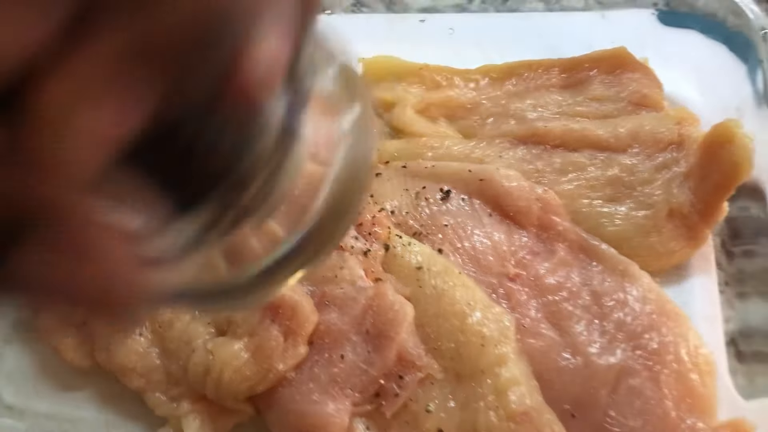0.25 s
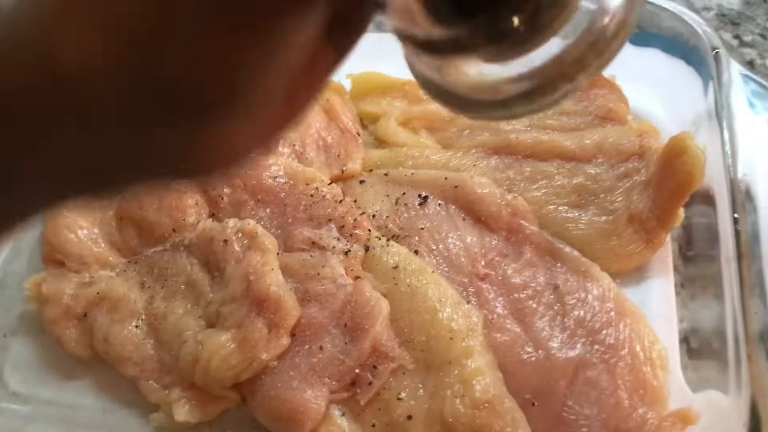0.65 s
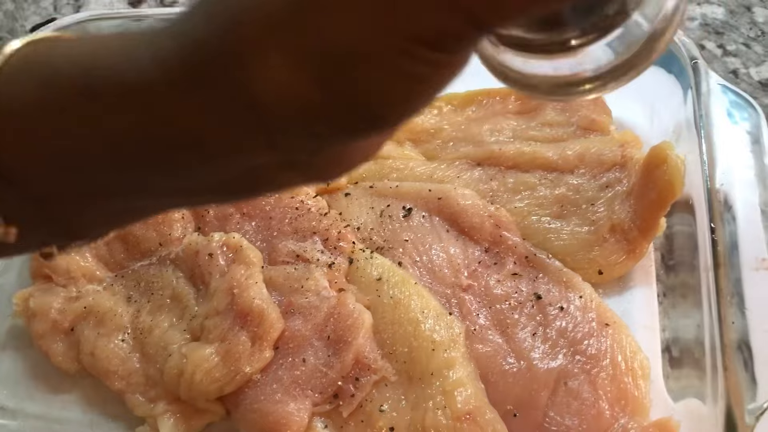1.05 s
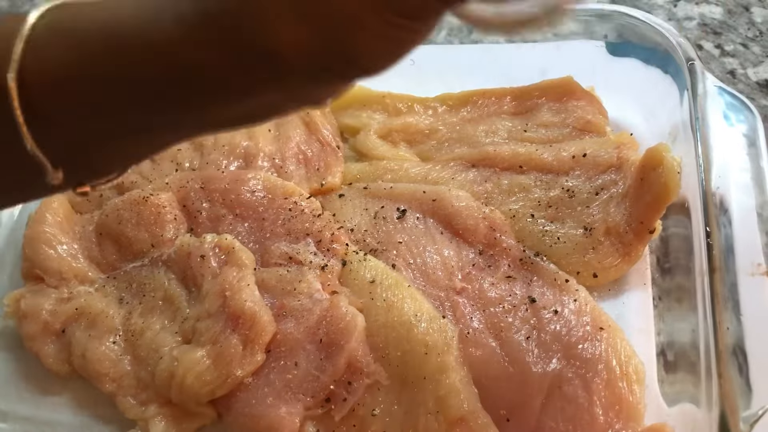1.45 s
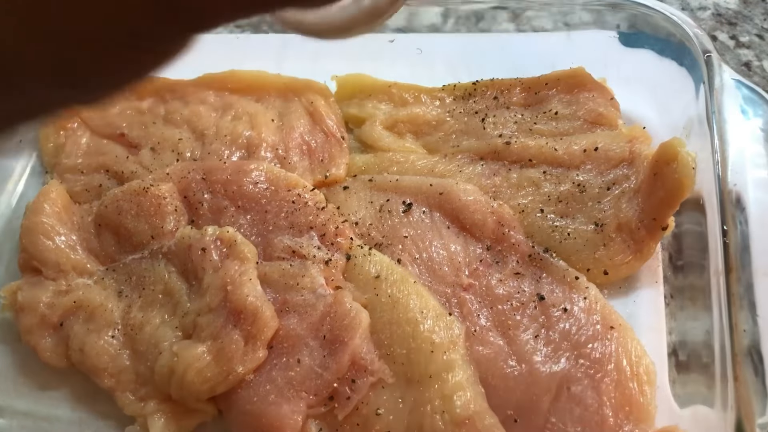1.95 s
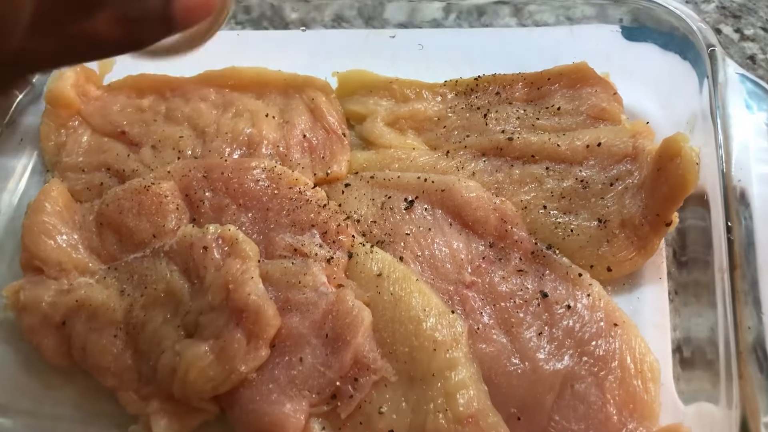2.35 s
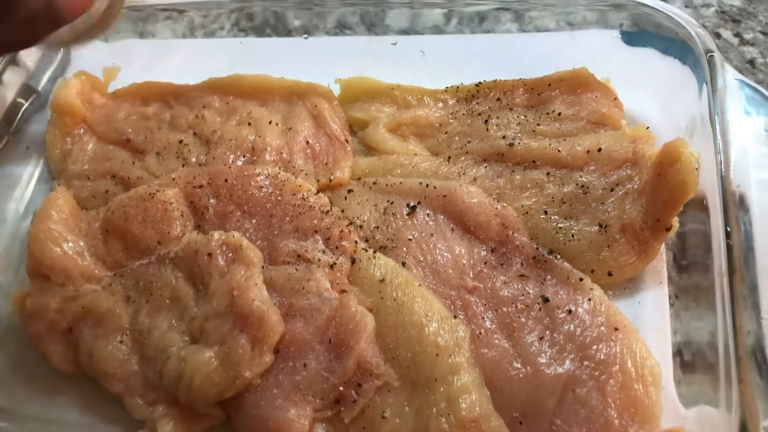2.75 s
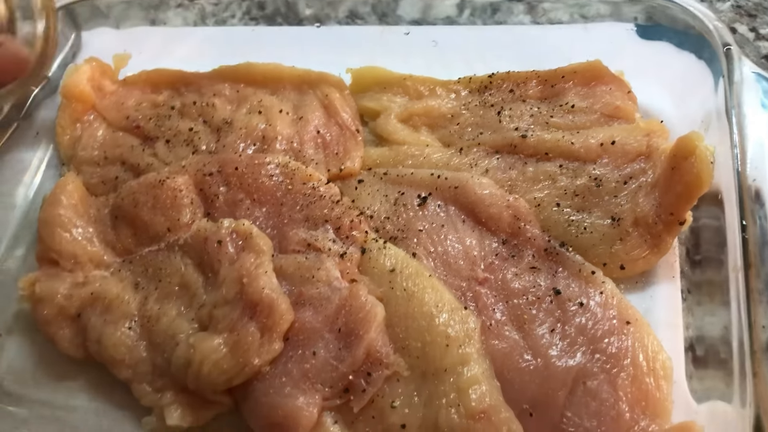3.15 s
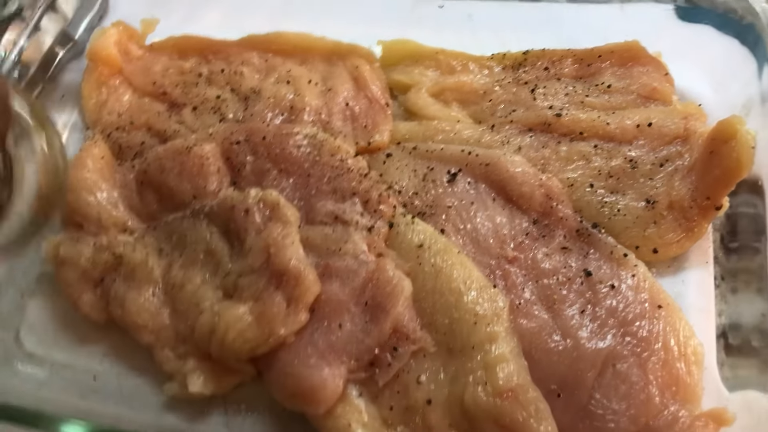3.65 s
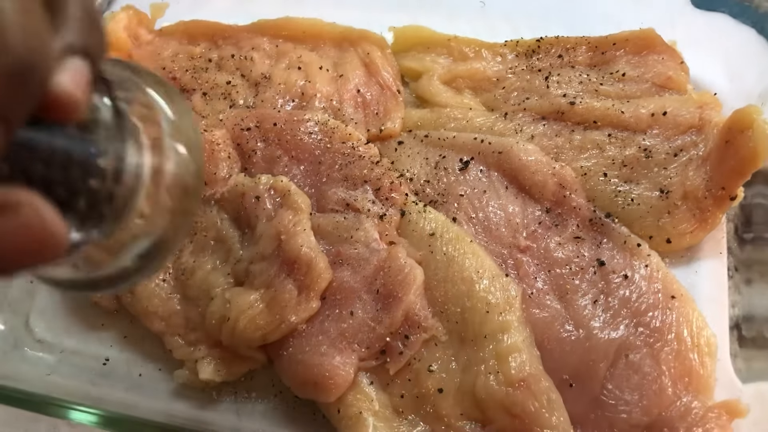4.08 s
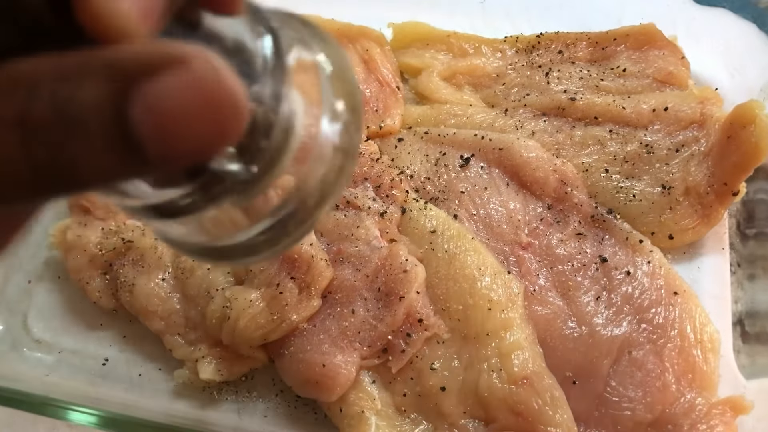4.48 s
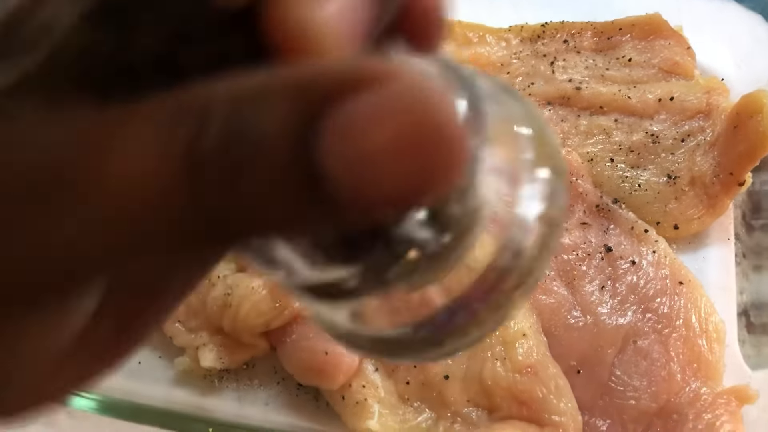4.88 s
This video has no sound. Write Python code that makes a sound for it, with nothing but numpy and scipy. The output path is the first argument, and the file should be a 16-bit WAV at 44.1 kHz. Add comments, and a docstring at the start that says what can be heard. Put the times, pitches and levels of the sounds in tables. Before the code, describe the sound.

A hand-held pepper grinder is twisted close by, cracking peppercorns in short, gritty, rhythmic crunches in a quiet kitchen.

```python
"""In a quiet kitchen, a hand-held pepper mill is twisted back and forth close to the microphone.
Peppercorns fracture between the burrs in short bursts, and the crumbs are sheared to grit, a dense
train of clicks. Both excite the modes of the mill's shell, and the hand adds soft, low knocks.
The walls reflect the mill's sound; beneath it lie steady room noise and a far appliance's hum."""
import sys
import numpy as np
from scipy import signal
from scipy.fft import rfft, irfft
from scipy.io import wavfile

SR = 44100
rng = np.random.default_rng(int(sys.argv[2]) if len(sys.argv) > 2 else 0)


def unload_audio(sound):
    """Save the sound as a 16-bit wav file, at the path given as the first command line argument."""
    columns = np.transpose(np.atleast_2d(sound))
    # keep every value between -1 and 1, then stretch to whole-number steps
    steps = np.round(np.clip(columns, -1, 1) * 32767)
    wavfile.write(sys.argv[1], SR, steps.astype(np.int16))


N = 225839
TIME = np.arange(N) / SR
CROSSOVER_HZ = 5650   # divides the body of a break from its treble


def from_db(db):
    """Amplitude ratio of a level in decibels."""
    return 10 ** (np.asarray(db) / 20)


def rms_one(x):
    """Normalisation to unit rms."""
    return x / np.sqrt(np.mean(x ** 2) + 1e-20)


def resonance(x, hz, width_hz):
    """A damped resonator: two poles, unit gain at the peak."""
    r = np.exp(-np.pi * width_hz / SR)
    poles = [1, -2 * r * np.cos(2 * np.pi * hz / SR), r * r]
    return signal.lfilter([(1 - r * r) / 2, 0, (r * r - 1) / 2], poles, x)


def passed(x, hz, kind):
    """Second-order low-, high- or band-pass filtering."""
    return signal.sosfilt(signal.butter(2, hz, kind, fs=SR, output="sos"), x)


def drift(rate_hz):
    """Slow random fluctuation: low-passed noise of unit rms."""
    return rms_one(passed(rng.standard_normal(N + SR), rate_hz, "low")[SR:])


# The spectrum of the room noise. Each row: frequency in Hz, relative spectral density in dB.
ROOM_SPECTRUM = [(25, -36), (45, -5.5), (125, 1.5), (340, -1.5), (420, -5.5), (900, -11), (2000, -16.5),
                 (4000, -72), (8000, -33), (15000, -32.5)]


def room_noise(level_db):
    """Stationary noise: a white spectrum weighted towards the bass."""
    hz = np.maximum(np.arange(N // 2 + 1) * SR / N, 1)
    point_hz, point_db = np.transpose(ROOM_SPECTRUM)
    colour = from_db(np.interp(np.log(hz), np.log(point_hz), point_db))
    return from_db(level_db) * rms_one(irfft(rfft(rng.standard_normal(N)) * colour, N))


# The partials of the hum. Each row: centre frequency in Hz, median rms level in dB.
HUM_PARTIALS = [(50, -72.5), (99, -66), (139, -66.5), (200, -71), (277, -70.5), (344, -68.5)]


def appliance_hum():
    """A line spectrum: each partial of the far appliance wavers in frequency and amplitude."""
    hum = 0
    for hz, level_db in HUM_PARTIALS:
        phase = 2 * np.pi * np.cumsum(hz + 1.54 * drift(4.5)) / SR
        hum += from_db(level_db + 4.3 * drift(5.5)) * np.sqrt(2) * np.sin(phase)
    return hum


# The kitchen's reverberation. Each row: band frequency in Hz, time to fall 60 dB in seconds,
# echo level in dB before weighting for bandwidth.
REVERB_BANDS = [(382, 0.081, -39.5), (928, 0.23, -34.5), (1600, 0.36, -31), (3110, 0.39, -28.5),
                (5050, 0.27, -25), (10200, 0.3, -17), (13300, 0.17, -16)]


def wall_echoes(x):
    """Reverberation: convolution with noise that decays exponentially, band by band."""
    t = np.arange(SR // 2) / SR
    onset = 1 - np.exp(-t / 0.00043)
    response = 0
    for hz, t60, echo_db in REVERB_BANDS:
        band = passed(rng.standard_normal(len(t)), [hz / 1.44, min(hz * 1.16, .45 * SR)], "band")
        tail = band * from_db(-60 * t / t60) * onset
        response += from_db(echo_db) * tail / np.sqrt(np.sum(tail ** 2) * 3 * hz / SR) / 2
    return signal.fftconvolve(x, response)[:N]


# The hand knocks or regrips the mill. Each row: start in seconds, level in dB, final pitch in Hz.
KNOCKS = [(0.198, -46, 171), (0.25, -43, 227), (0.309, -50, 116), (0.373, -47, 124), (0.469, -42.5, 229),
          (.895, -65, 231.3), (0.941, -42.5, 70), (0.974, -48, 287), (0.986, -39, 80), (1.841, -39, 170),
          (3.051, -40.5, 200), (3.487, -41.5, 210), (1.368, -58, 302), (2.19, -52.5, 193),
          (3.61, -44.5, 130), (3.665, -43, 246), (4.277, -36, 206), (4.643, -46, 167), (4.701, -43, 103),
          (4.804, -35, 200), (4.852, -43, 179), (4.915, -36, 151), (5.04, -35, 230)]


def hand_knocks(sag, sag_s, decay_s):
    """Soft impact: a damped low tone whose pitch sags as the skin flattens."""
    t = np.arange(SR // 10) / SR
    out = np.zeros(N + len(t))
    for start, level_db, hz in KNOCKS:
        phase = 2 * np.pi * np.cumsum(hz * (1 + sag * np.exp(-t / sag_s))) / SR
        i = round(start * SR)
        out[i:i + len(t)] += from_db(level_db) * np.sin(phase) * np.exp(-t / decay_s)
    return out[:N]


# The modes of the mill's plastic shell. Each row: frequency in Hz, bandwidth in Hz, relative gain in dB.
SHELL_MODES = [(910, 460, 5.5), (1530, 1400, 23.5), (2100, 350, -12), (2580, 1800, 29), (3470, 300, 5),
               (4640, 1100, 27.5), (6200, 900, -22)]


def shell(x):
    """Modal superposition: the shell's broad resonances add with alternating sign."""
    return sum((-1) ** k * from_db(db) * resonance(x, hz, width)
               for k, (hz, width, db) in enumerate(SHELL_MODES))


def treble(x, hz, width_hz):
    """Spectral shaping of a break's bright end: a broad resonance over a fainter flat top."""
    high = passed(x, CROSSOVER_HZ, "high")
    peak = resonance(resonance(high, hz, width_hz), hz, 2 * width_hz)
    return rms_one(peak + from_db(-3) * high)


# Turns of the wrist, strong forwards and weak backwards. Each row: start and end in seconds, grit level
# in dB, bite and release rates in dB per second, base rasp and brightness in dB relative to the grit.
WRIST_TURNS = [(0.0, 0.073, -44.5, 450, 401.5, 4.5, -3.5), (0.184, 0.216, -57.5, 597, 595.5, -10, -0.5),
               (0.325, 0.386, -61.5, 899.5, 395.5, 1, 7.5), (0.412, 0.546, -44.5, 696.5, 698.5, 0, -6.5),
               (0.798, 0.876, -65, 304, 397, -10, 8.5), (0.901, 0.978, -45, 499.5, 252.5, 6, -12.5),
               (1.257, 1.324, -60.5, 1505, 405, 5, -3.5), (1.356, 1.421, -36, 1503, 297.5, -9.5, -6),
               (1.583, 1.601, -61, 401, 400, -8, -3.5), (1.773, 1.869, -37.5, 299, 450, -12.5, -3.5),
               (2.186, 2.255, -38, 499.5, 346.5, -24, -8), (2.351, 2.391, -58.5, 510, 301.5, 1, -8.5),
               (2.601, 2.667, -38, 905, 350, -12, -5.5), (2.762, 2.815, -60.5, 389, 397, -26, -12),
               (2.945, 2.988, -59, 701, 401.5, -5, -3.5), (3.004, 3.077, -39, 900, 282, 1.5, -10),
               (3.327, 3.391, -59, 597, 396, -11, -3), (3.432, 3.499, -39.5, 281, 448.5, 1.5, -5.5),
               (3.834, 3.908, -43.5, 401, 301, 2.5, -2.5), (4.15, 4.237, -63, 798, 401.5, 2.5, -3.5),
               (4.252, 4.298, -35.5, 1494.5, 299.5, -2, -7), (4.613, 4.668, -59, 1494.5, 397.5, 6.5, 0),
               (4.69, 4.752, -36, 1508.5, 603, -2.5, -3.5), (4.802, 4.834, -54, 491, 198.5, 4, -6),
               (5.039, 5.07, -56, 1511, 393, -15, -2), (5.103, 5.122, -42.5, 601.5, 400, -7, -3)]


def wrist():
    """Envelopes in dB of grit, rasp and brightness: turns bite, hold and let go, and their powers add."""
    power = 1e-9
    for start, end, hold_db, bite, release, _, _ in WRIST_TURNS:
        before, after = np.maximum(start - TIME, 0), np.maximum(TIME - end, 0)
        turn_db = -bite * before - release * after
        trickle_db = -19 - 200.5 * before - 80 * after   # loose crumbs around the turn
        power += from_db(2 * (hold_db + np.maximum(turn_db, trickle_db)))
    grit_db = 10 * np.log10(power)
    starts, ends, *_, rasps, brights = np.transpose(WRIST_TURNS)
    middles = (starts + ends) / 2
    rasp_db = np.interp(TIME, middles, rasps) + 0.056 * (grit_db + 39)   # burrs ring more under load
    bright_db = np.interp(TIME, middles, brights) + 0.037 * (grit_db + 42)
    return grit_db, rasp_db, bright_db


# The moving mill has more bass near the microphone. Each row: time in seconds, extra rumble in dB.
PROXIMITY = [(0, 1), (.9, 6), (1.6, 0.5), (2.4, -4), (3.4, -5), (4.2, 2), (5.12, 5)]


def grit(grit_db, rasp_db, bright_db, clicks_per_s, spread_db):
    """Shot noise: crumbs sheared between the burrs give dense, uneven clicks that come in clumps."""
    sizes = from_db(spread_db * np.minimum(rng.exponential(1, (4, N)), 4))
    signs = rng.choice([-1, 1], (4, N))
    clumps = from_db(3.58 * drift(53))
    clicks = sizes * signs * (rng.random((4, N)) < clicks_per_s / SR) * clumps
    body = rms_one(passed(shell(clicks[0]), 5100, "low"))
    bright = from_db(bright_db) * treble(clicks[1], hz=3800, width_hz=6900)
    rumble_db = -11 + np.interp(TIME, *np.transpose(PROXIMITY))
    rumble = from_db(rumble_db) * rms_one(passed(clicks[2], [68.6, 900], "band"))
    rasp = from_db(rasp_db) * rms_one(resonance(clicks[3], hz=5070, width_hz=1100))   # the burrs' ring
    return from_db(grit_db) * (body + bright + rumble + rasp)


def splinters(grit_db, count, low_hz, high_hz):
    """A random point process: rows of small fractures, denser and louder the harder the turn."""
    when, size, pitch, thud, snap, duration = rng.random((count, 6)).T
    cumulative_chance = np.cumsum(from_db(.25 * grit_db))
    i = np.searchsorted(cumulative_chance, when * cumulative_chance[-1])
    level_db = grit_db[i] - 2 - 4 * np.log(1 - .95 * size)
    hz = low_hz * (high_hz / low_hz) ** pitch
    thud_db, snap_db = -26 + 16 * (thud - .5), -13 + 16 * (snap - .5)
    crumble_ms = 2.3 * 3 ** (duration - .5)
    return np.transpose([i / SR, level_db, hz, thud_db, snap_db, crumble_ms])


# The peppercorns that crack aloud. Each row: start in seconds, level in dB, ring frequency in Hz,
# thud and snap in dB relative to that level, crumbling time constant in milliseconds (capped at 12).
FRACTURES = [(.0112, -31.5, 3240, -5, -3, 3.1), (.024, -29, 2320, -5, 0, 2.7),
             (.0604, -30, 3200, -10, -17, 1.3), (.0834, -40, 4500, -24, -17, 1.4),
             (.1879, -43.5, 3000, 3.5, -18, 2.5), (.196, -31, 2650, -3, -33, 1.26),
             (.2473, -44.5, 1310, -24, -7, 3.8), (.3156, -52.5, 5740, -17, 1, 4.2),
             (.3396, -45.5, 5840, -11, 4, 0.98), (.361, -46.5, 2780, -5, -1, 1.3),
             (.367, -44, 1280, -1, -8, 1.5), (.38, -45.5, 2910, -5, -16, 2.8),
             (.4108, -34.5, 2780, -30, -13, 1.4), (.4189, -37.5, 2340, -31, -3, 14),
             (.4447, -31, 4620, -34, -12, 2.9), (.4681, -27.5, 2550, -15, -7, 2.8),
             (.4771, -25, 4600, -33, -11, 1.1), (.4807, -29.5, 2550, -28, -7, 3),
             (.5, -35, 4600, -34.5, -6, 5.2), (.5314, -33.5, 4740, -10.5, -10, 5.3),
             (.5453, -31.5, 4660, -10, -18, 1.1), (.6256, -42.5, 5150, -16, -10, 1.3),
             (.6366, -42.5, 2280, -3, -9, 2.5), (.684, -45, 1510, -4, -14, 2),
             (.7034, -50, 1220, -7, -4, 1.2), (.7536, -50.5, 2320, 1, -12, 3.8),
             (.8096, -47, 6040, -21, 3, 0.86), (.8267, -48, 2140, 3.5, -10, 3.1),
             (.8322, -44, 1250, -11, -19, 1.6), (.8594, -43.5, 2600, -14, -2, 1.4),
             (.8816, -49, 4970, -9, -12, 2.9), (.8923, -24.5, 4640, -19, -7, 4.2),
             (.9168, -28, 2760, -28, -15, 2.3), (.9247, -10.5, 4780, -15, 0, 1.9),
             (.927, -14.5, 1560, -6, -8, 1.14), (.9493, -30.5, 1420, -10, -18, 2.5),
             (.9707, -13, 2420, -12.5, -2, 2.63), (.9924, -29.5, 2750, -4, -4, 3.7),
             (1.0158, -36, 4500, -27, -1, .88), (1.2486, -32, 1350, -19, 1, .64),
             (1.252, -21.5, 1845, -19, -17.5, 2.4), (1.3033, -48.5, 5200, 0.5, -5, 1.9),
             (1.3529, -23.5, 2680, -17, -4.5, 8.2), (1.3663, -39, 2820, -24, 9, 1.5),
             (1.378, -21.5, 2500, -22, -1.5, 2.6), (1.3859, -18.5, 1710, -10.5, -21, 1),
             (1.3956, -29, 4400, -17, -24, 3.3), (1.4051, -26, 1960, -19, -19, 4.7),
             (1.4216, -40, 4350, -4, -14, 3.4), (1.4328, -40, 4280, -4, -5.5, 9.8),
             (1.5034, -46, 5560, -23, 7.5, 1.2), (1.5156, -57, 5400, -6, 0, 1.1),
             (1.5773, -42.5, 1950, -16, -8, 2.7), (1.591, -39, 1920, -7, -15, 1.9),
             (1.7013, -47, 2680, -0.5, -4, 1.3), (1.7221, -46, 1970, -17.5, -12, 3.8),
             (1.7351, -55, 2420, -21, -13, 2), (1.7433, -29, 2460, -27, -16, 0.58),
             (1.7551, -37, 6200, -28, -5, 2.1), (1.7671, -24.5, 2860, -40, -27, 1.2),
             (1.781, -25, 2020, -30, -13, 1.6), (1.7891, -19, 3200, -36, -27, 0.99),
             (1.812, -37, 2450, -2, -18, 5.8), (1.8217, -30, 2600, -17, -25, 5.2),
             (1.8372, -21.5, 2980, -4.5, -2, 1.7), (1.8605, -37, 4300, -18, -6, 11),
             (1.8763, -41, 3200, -2, -1, 5.9), (2.081, -43, 3190, -5.5, -12, .96),
             (2.0894, -57.5, 1210, -1, -1.5, 2.5), (2.1419, -54.5, 2470, -0.5, -5, 4.9),
             (2.1578, -35.5, 2380, -26, -28, 1.8), (2.1747, -35, 1560, -20, -10, 1.4),
             (2.1791, -37, 2200, -30, -13, 3.9), (2.2023, -38.5, 3300, 3, -1, 6.5),
             (2.211, -31.5, 1440, -8, -15, 3.5), (2.2295, -28.5, 2300, -29, -10, 3.7),
             (2.248, -36.5, 2830, 0.5, -16, 4.4), (2.2699, -40.5, 1730, -27, -12, 3.7),
             (2.3487, -38, 2110, -12.5, -11, 3.1), (2.3857, -49, 2540, -3, -18, 3.7),
             (2.4254, -47, 1336, 2, -23, 2.7), (2.4868, -51, 1290, -3.5, -9, 2.6),
             (2.5414, -47.5, 1300, -3, -18, 1.6), (2.5555, -44, 2620, -12, -9, 5.2),
             (2.5945, -33.5, 2180, -29, -2, 2.2), (2.6017, -27, 2370, -32, -9, 1.4),
             (2.6378, -31, 1880, -26, -22, 4.6), (2.656, -36.5, 2400, -3, 1, 8.6),
             (2.7567, -39.5, 2080, -5, -6, 3.5), (2.8189, -47, 5520, 0, -12, 0.96),
             (2.911, -46.5, 1880, -5, -9, 2.4), (2.9202, -51, 2130, -4, -22, 0.93),
             (2.9413, -40.5, 5990, -6, 1.5, 2.2), (2.949, -43.5, 2030, -22, -6, 2.1),
             (2.9887, -36, 2360, -3, -16, 0.95), (3.0098, -29.5, 2700, -13, -5, 4.7),
             (3.0274, -34, 2360, -6.5, -23, 3.1), (3.0466, -20, 2920, -17.5, -3, 3.9),
             (3.0701, -31, 4480, -22, -8, 1.6), (3.0831, -37, 2960, -21, -2, 2.5),
             (3.1405, -45.5, 5740, -19, -16, 2.9), (3.2059, -46, 2300, -2, -8.5, 3.6),
             (3.25, -53, 1190, 1.1, -10, 2.6), (3.3553, -46.5, 2570, 3, -9.5, 1.5),
             (3.363, -41.5, 2490, -21, -6, 2), (3.4124, -48, 4910, -30, -11, 5.2),
             (3.4258, -39, 2100, -28, -12, 7.7), (3.432, -36, 3750, -30, -20, 4.4),
             (3.4586, -34, 3650, -25, -22, 13), (3.4842, -28.5, 4770, -1.5, -5, 3.2),
             (3.5078, -36, 5030, -33, -3, 1.6), (3.554, -44, 5450, -11, 5.5, 3.6),
             (3.5683, -33, 5700, -32, -7, 1.6), (3.5772, -36.5, 5800, -28, -7, 3.5),
             (3.5916, -43, 5270, -8, -18, 5.1), (3.6187, -44, 2040, -6, -5, 3.5),
             (3.667, -39.5, 1780, -4, -14, 2.2), (3.7312, -54, 6000, 1, -0.5, 16),
             (3.7594, -50.5, 1840, -8, -5, 4.2), (3.7833, -40.5, 2730, -9, -2, 1.4),
             (3.8364, -35, 5060, -10, -15, 2.2), (3.8863, -35, 2950, -3.5, -3, 9.9),
             (3.8964, -33, 2190, -4, -14, 2.1), (3.9102, -36, 4800, -25, -8, 3),
             (3.9495, -31.5, 4760, -10.5, -7.5, 2.5), (3.9776, -44, 3560, -19, -5, 1.2),
             (4.009, -42, 3600, -14, -4, 1.4), (4.0492, -40, 2480, -3.5, -9.5, 3),
             (4.1488, -52, 3840, 2.5, -12, 1.5), (4.1789, -47.5, 2280, -1, -7, 2.7),
             (4.1998, -43.5, 2760, -20, -8, 1.5), (4.2486, -33, 2800, -20, -7.5, 11),
             (4.2732, -11, 2700, -20, .5, 1.07), (4.2759, -31, 3070, -5, -1, 16),
             (4.305, -41, 2870, -2, 5, 1.8), (4.3258, -35, 3500, -8, -4, 3.5),
             (4.3505, -40.5, 3100, -13, -7.5, 4.3), (4.4174, -36.5, 2160, -9.5, -10.5, 3.2),
             (4.538, -52.5, 1530, 5, -11, 2.7), (4.6081, -45.5, 2465, 1, -9, 2.5),
             (4.628, -36.5, 3100, -45, -4, 1.1), (4.6389, -36.5, 2780, -12, -6, 1.9),
             (4.677, -34, 4590, -26, -20, 1.36), (4.686, -10.5, 4420, -31, -1.5, 0.7),
             (4.7118, -32, 4480, -16, -7, 1.6), (4.741, -25.5, 1250, -17, -4, 0.99),
             (4.7441, -27.5, 2450, -2.5, -14, 1.2), (4.794, -40.5, 4330, -18, 3, 5.2),
             (4.802, -20, 3040, -5.5, -3, 2.65), (4.8503, -38.5, 1190, -5, -7, 1.1),
             (4.8656, -31.5, 1430, -14, -17, 1.3), (4.9109, -45.5, 4830, -15, 3.5, 1.1),
             (4.9153, -49.5, 1210, 8, -3, 1.7), (4.9406, -47, 5300, -24, -13, 0.57),
             (4.9565, -45.5, 1620, -3, -11, 3.4), (4.994, -61, 4450, -10, 8, 1.4),
             (5.038, -30.5, 1390, -6, -2.5, 2.6), (5.041, -29, 4600, -31, -22, 1.4),
             (5.0941, -23.5, 2500, -6.5, -10, 1.64)]


def cracks(splinter_rows, rise_s, split_s, ring_q):
    """Brittle fracture: each burst excites one damped ring, the shell, a thud and a bright snap."""
    rows = np.vstack([FRACTURES, splinter_rows])
    length = 2048
    t = np.arange(length) / SR
    noise = rng.standard_normal((len(rows), 3, length)) * (1 - np.exp(-t / rise_s))
    noise *= np.sqrt(np.abs(noise))   # fragments are spikier than plain noise
    split = from_db(3.5) * np.exp(-t / split_s)
    out = np.zeros(N + length)
    for (start, level_db, hz, thud_db, snap_db, crumble_ms), fragments in zip(rows, noise):
        crumble_s = min(crumble_ms, 12) / 1000
        burst = fragments * (split + np.exp(-t / crumble_s))   # the husk splits, then the pieces crumble
        ring = rms_one(resonance(burst[0], hz, hz / ring_q))
        shell_ring = from_db(-5) * rms_one(shell(burst[0]))
        body = rms_one(passed(ring + shell_ring, CROSSOVER_HZ, "low"))
        jolt = fragments[1] * np.exp(-t / (1.8 * crumble_s))   # the whole mill responds more slowly
        thud = from_db(thud_db) * rms_one(passed(jolt, [429, 1400], "band"))
        snap = from_db(snap_db) * treble(burst[2], hz=7960, width_hz=4500)
        gain = from_db(level_db) * np.sqrt(crumble_s * SR / length)   # energy grows with duration
        i = round(start * SR)
        out[i:i + length] += gain * (body + thud + snap)
    return out[:N]


def scene():
    """Superposition of the mill's direct sound, its reverberation and the background."""
    grit_db, rasp_db, bright_db = wrist()
    mill = grit(grit_db, rasp_db, bright_db, clicks_per_s=5000, spread_db=5)
    mill += hand_knocks(sag=2.9, sag_s=.004, decay_s=.008)
    splinter_rows = splinters(grit_db, count=90, low_hz=1510, high_hz=5900)
    mill += cracks(splinter_rows, rise_s=.0002, split_s=.00035, ring_q=4.9)
    return (mill + wall_echoes(mill) + room_noise(level_db=-59) + appliance_hum())[None]


def record(dry):
    """Soft saturation rounds the loudest peaks; a steep low-pass limits the band to 15.8 kHz."""
    rounded = .9 * np.tanh(dry / .9)
    return signal.sosfilt(signal.ellip(12, .5, 95, 15800, fs=SR, output="sos"), rounded)


dry = scene()
out = record(dry)
unload_audio(out)
```